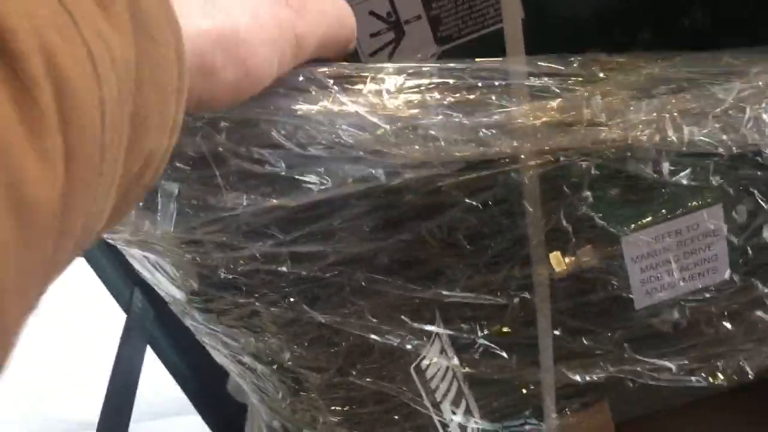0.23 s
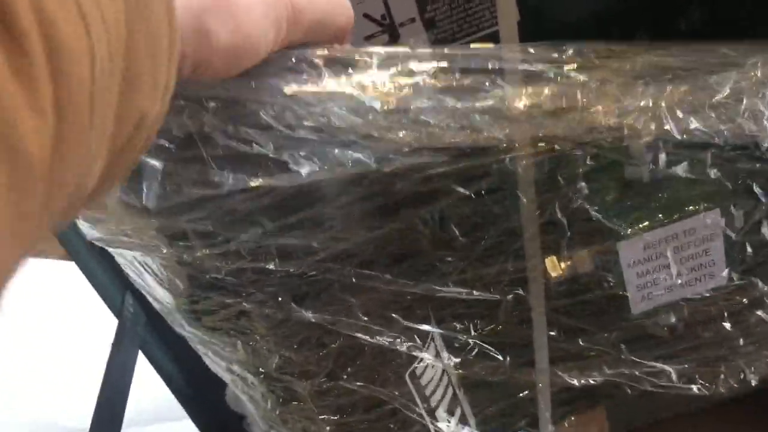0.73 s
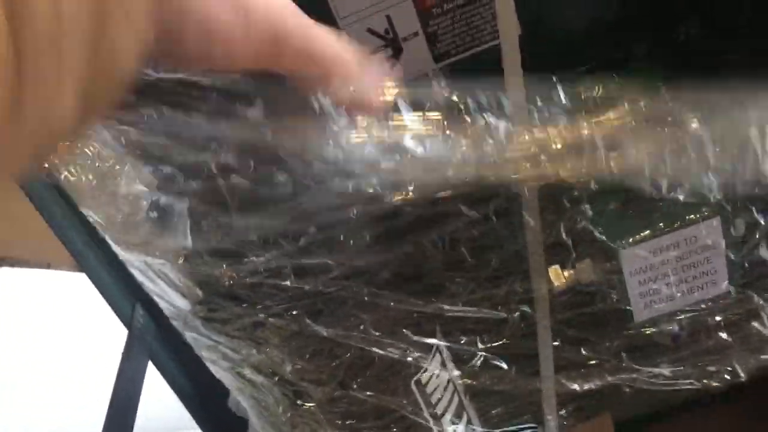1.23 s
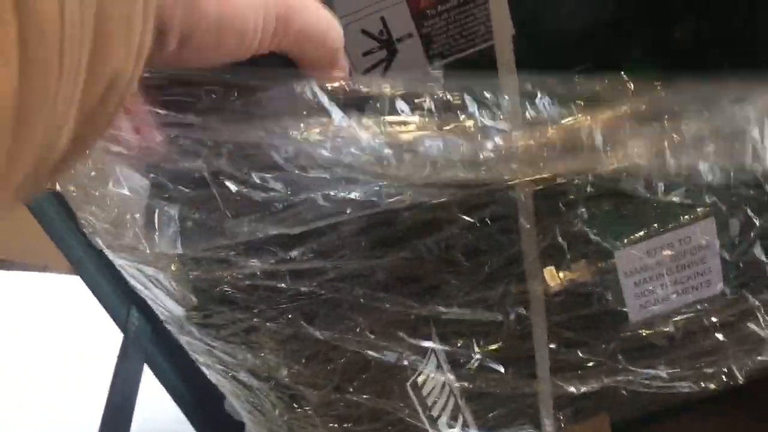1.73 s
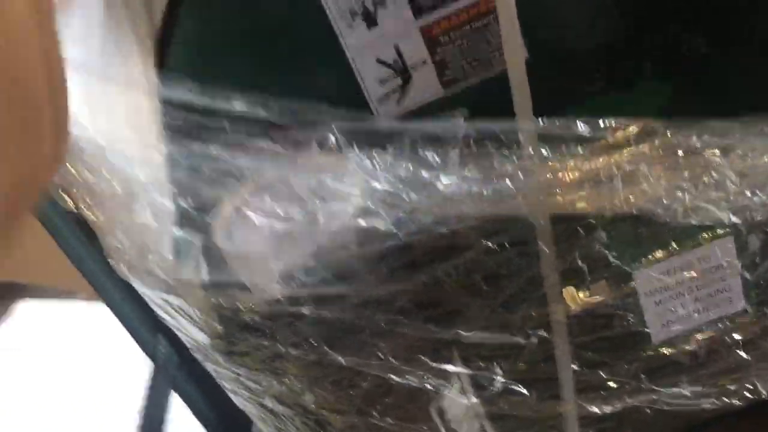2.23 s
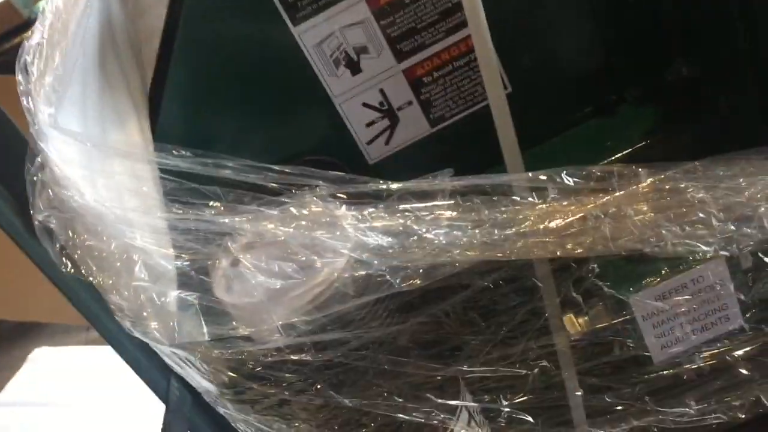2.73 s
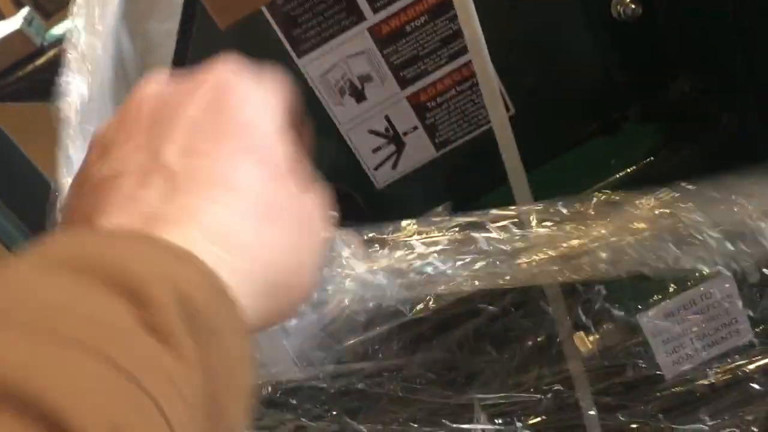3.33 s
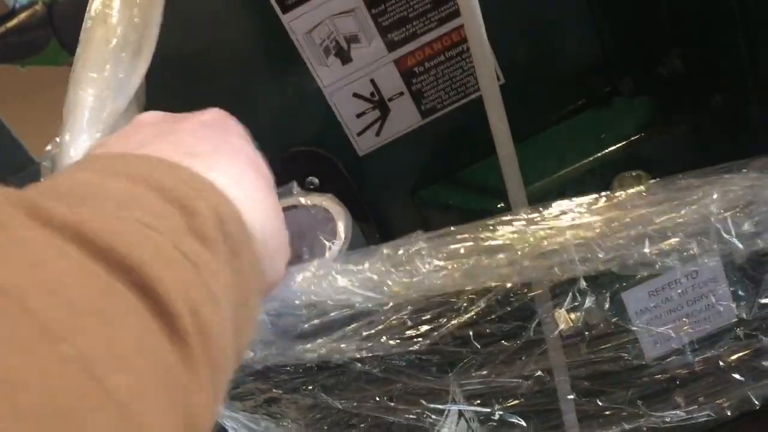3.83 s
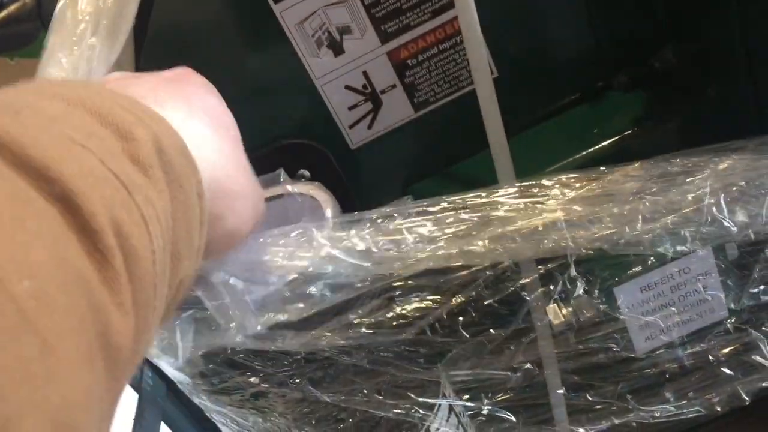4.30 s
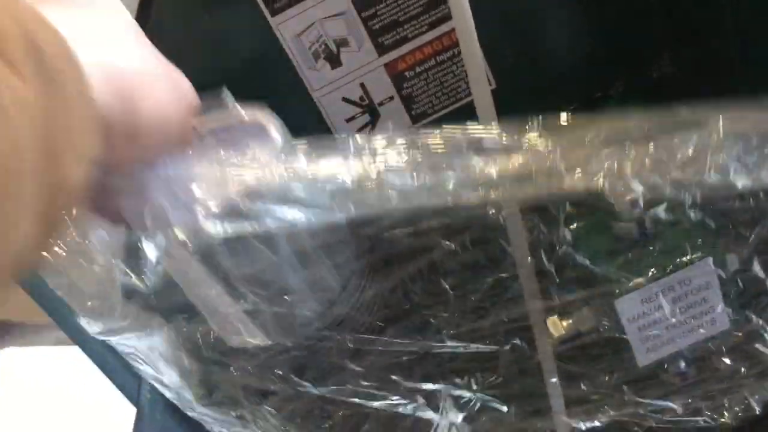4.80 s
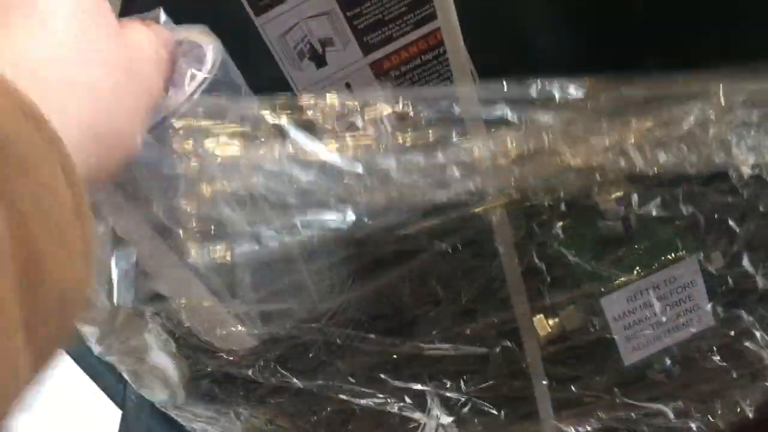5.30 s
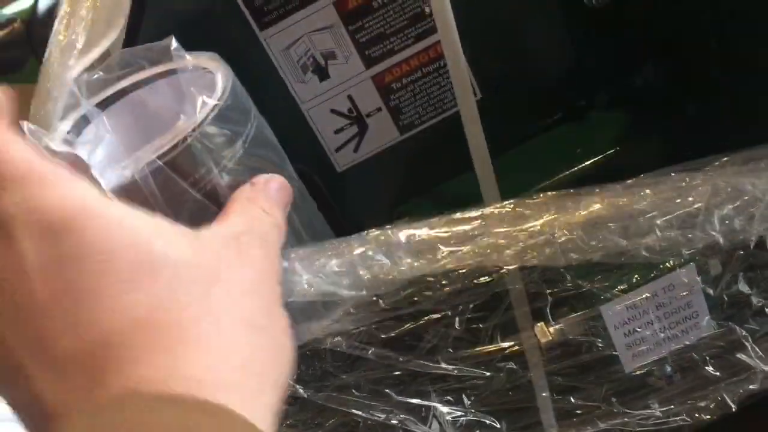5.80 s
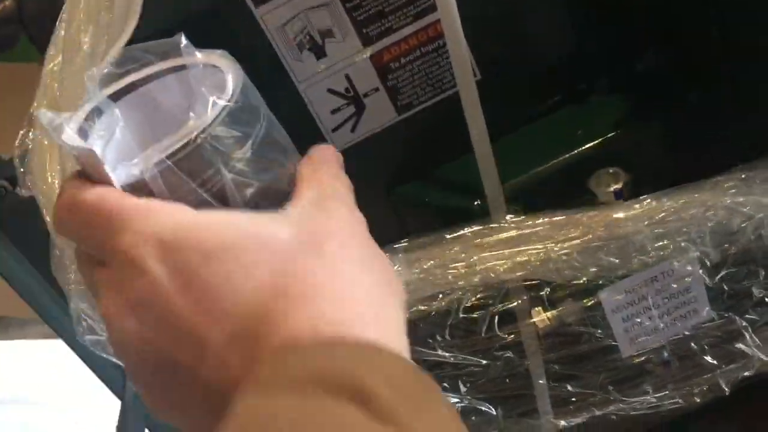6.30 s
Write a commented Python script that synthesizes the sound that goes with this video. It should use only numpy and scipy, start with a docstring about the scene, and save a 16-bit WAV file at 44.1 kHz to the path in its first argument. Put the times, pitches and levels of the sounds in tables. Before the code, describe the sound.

Close, dry crinkling of clear packing film in a quiet room, tugged in bursts, with sharp snaps and dull hollow metal thuds.

```python
"""A quiet room, close to the microphone: a hand pulls thin plastic wrap off painted metal parts and
works a bagged hollow cylinder free. Creases buckle as dense, clumped clicks in many narrow bands;
louder snaps are short ringing bursts of shocks. The cylinder knocks and drags on the sheet-metal
frame, both sounding decaying modes of the parts; it groans once as a sinking tone.
Beneath lie a short diffuse tail, a hush of wandering noise bands and a faint whine."""
import sys
import numpy as np
from scipy import signal
from scipy.io import wavfile

SR = 44100
rng = np.random.default_rng(int(sys.argv[2]) if len(sys.argv) > 2 else 0)


def wav_out(sig):
    """Save sig, one row per channel (or a flat mono array), as 16-bit PCM at SR to the path in sys.argv[1]."""
    wavfile.write(sys.argv[1], SR, np.round(np.clip(np.atleast_2d(sig).T, -1, 1) * 32767).astype(np.int16))


N = 288855


def from_db(db):
    """Decibels to amplitude gain."""
    return 10 ** (np.asarray(db) / 20)


def rms_one(x):
    """Scale to unit rms."""
    return x / np.sqrt(np.mean(x ** 2) + 1e-20)


def at_hz(points, hz):
    """Read a spectrum on a log-frequency axis."""
    points_hz, points_db = np.array(points).T
    return np.interp(np.log(hz), np.log(points_hz), points_db)


def drift(rate_hz):
    """Slow random wander of rms 1: noise through a double one-pole low-pass, at an eighth of the rate."""
    r = np.exp(-16 * np.pi * rate_hz / SR)
    noise = rng.standard_normal(N // 8 + 2002)
    slow = signal.lfilter([1], [1, -2 * r, r * r], noise)[2000:]  # drop the filter's start
    return np.interp(np.arange(N) / 8, np.arange(len(slow)), rms_one(slow))


def band(x, low_hz, high_hz):
    """Band-pass."""
    return signal.sosfilt(signal.butter(2, [low_hz, high_hz], "band", fs=SR, output="sos"), x)


def ring(force, hz, t60_s):
    """A resonator: a unit click sets a decaying sine of height 1 ringing."""
    r = from_db(-60 / (t60_s * SR))
    w = 2 * np.pi * hz / SR
    return signal.lfilter([0, np.sin(w)], [1, -2 * r * np.cos(w), r * r], force + 1e-18)


def clicks(per_s, spread_db):
    """Random clicks of either sign, a few much larger than the rest."""
    sizes = from_db(spread_db * np.minimum(rng.exponential(1, N), 5))
    signs = rng.choice([-1, 1], N)
    return sizes * signs * (rng.random(N) < per_s / SR)


# Tugs at the film; the levels are relative and all follow the crackle's course: start_s, length_s,
# crackle_start_db, crackle_end_db, large_crease_db, frame_drag_start_db, cylinder_drag_start_db
TUGS = [(0.001, 0.15, -40.5, -34.5, 1.5, -45.5, -54), (0.221, 0.066, -35.5, -40, 11.5, -34, -54),
        (0.372, 0.12, -39.5, -35, 1.5, -51, -62), (0.56, 0.017, -33.5, -33.5, 6.5, -34, -49),
        (0.665, .18, -40, -41, 6.5, -48.5, -55), (0.874, 0.18, -32.5, -31.5, 0, -49, -47.5),
        (1.152, 0.052, -28, -37.5, 4.5, -31, -29.5), (1.228, .14, -43, -34, 3.5, -47, -60),
        (1.402, 0.077, -45, -52.5, 12, -30.5, -37.5), (1.483, 0.064, -43.5, -24, 9, -46.5, -61),
        (1.582, .14, -40, -40.5, 1, -37, -50), (1.802, 0.15, -44, -38, 12, -42, -43.5),
        (2.011, 0.081, -41.5, -36, 12, -42, -40.5), (2.127, 0.042, -46.5, -48.5, 9.5, -37, -43),
        (2.226, 0.17, -54, -61.5, 21, -46.5, -57), (2.473, 0.085, -49.5, -52, 7, -53, -69),
        (2.598, 0.23, -56.5, -64, 9, -56, -67), (2.848, 0.14, -65.5, -69.5, 3, -45, -67),
        (3.069, 0.014, -52, -61, 18, -36, -66), (3.15, 0.087, -66.5, -74, 11, -37.5, -75),
        (3.304, 0.18, -59.5, -65, 20, -55, -64), (3.442, 0.057, -37, -27.5, -5, -56, -46.5),
        (3.528, 0.053, -37.5, -39.5, -4, -63, -43), (3.651, .43, -41, -32, -0.5, -62.5, -50.5),
        (4.095, 0.19, -40, -47.5, -6, -57, -54), (4.395, 0.2, -38.5, -39, 0, -64, -52),
        (4.638, 0.064, -34, -36, -0.5, -49.5, -46.5), (4.75, 0.26, -32.5, -28.5, 0.5, -54.5, -48),
        (5.003, 0.17, -27.5, -37.5, -1, -49, -43.5), (5.248, 0.059, -35, -27, -2.5, -56, -50),
        (5.31, .12, -30.5, -30.5, 1.5, -47, -42), (5.484, 0.16, -39, -43, 11, -45, -43),
        (5.652, 0.2, -33.5, -42, 6.5, -45, -41), (5.844, 0.16, -40, -38, 7.5, -60, -49.5),
        (6.073, 0.053, -42, -41, 7, -54, -46), (6.231, 0.3, -36, -37, 5.5, -51.5, -54.5)]
TIGHTEN_DB_PER_S, SLACKEN_DB_PER_S = 418, 367   # how fast a tug sets in and lets go
SETTLE_DB_PER_S = 243   # the metal parts come to rest more slowly


def tugs():
    """Levels of crackle, large creases and drag: each tug sets in, holds its course and lets go."""
    t = np.arange(0, N + 64, 64) / SR
    start, length, film_db, end_db, large_db, frame_db, cylinder_db = np.transpose(TUGS)[:, :, None]
    course_db = (end_db - film_db) * np.clip((t - start) / length, 0, 1)
    course_db = course_db - TIGHTEN_DB_PER_S * np.maximum(start - t, 0)
    after_s = np.maximum(t - start - length, 0)
    film_db = film_db - SLACKEN_DB_PER_S * after_s
    frame_db = frame_db - SETTLE_DB_PER_S * after_s
    cylinder_db = cylinder_db - SLACKEN_DB_PER_S * after_s
    # overlapping tugs add in power
    powers = [from_db(2 * np.maximum(db + course_db, -120)) for db in (film_db, frame_db, cylinder_db)]
    large = np.sum(powers[0] * large_db, axis=0) / np.sum(powers[0], axis=0)
    film, frame, cylinder = [10 * np.log10(np.sum(p, axis=0)) for p in powers]
    return [np.interp(np.arange(N) / SR, t, curve) for curve in (film, large, frame, cylinder)]


# Colour of the crackling film: pitch_hz, relative level_db (per Hz)
FILM = [(180, -41), (300, -9), (574, 2), (1030, 4.5), (1840, 6.5), (2100, 5), (2610, 7), (4520, 5.5),
        (4910, 4), (5800, 8), (7690, -0.5), (9390, 2), (10400, -3), (15000, -2.5), (16000, -16)]
CLICKS_PER_S = 6000   # for a busy film, before clumping
CLICK_SPREAD_DB, LARGE_TOP_DB = 4.5, 17


def crackle(level_db, large_db):
    """Creases buckle in clumps, sparsely when the film is left alone; large ones sound low."""
    clump_db = 2.4 * drift(40) + 1.4 * drift(200)
    busy = np.clip(from_db(0.7 * (level_db + 50)), .03, 1)
    train = clicks(CLICKS_PER_S * busy * from_db(clump_db), CLICK_SPREAD_DB)
    train = train * from_db(0.42 * clump_db) / np.sqrt(busy)
    band_place = rng.uniform(-2, 24, N)      # the band nearest each click's crease size
    slide = rng.standard_normal((2, N))      # film sliding on film
    large_db = np.minimum(large_db, LARGE_TOP_DB)
    out = 0
    for k, hz in enumerate(np.geomspace(400, 14500, 22)):
        reach = np.exp(-((band_place - k) / 2.0) ** 2)
        grain = rms_one(band(train * reach, hz / 1.09, hz * 1.09))
        hiss = rms_one(band(slide[k % 2], hz / 1.09, hz * 1.09))
        low_share = np.clip(np.log(6000 / hz) / 2.35, 0, 1)
        band_db = at_hz(FILM, hz) + low_share * large_db + 1.12 * drift(10.8)
        gain = from_db(band_db) * np.sqrt(hz / 6000)  # wider bands carry more
        out = out + gain * (grain + 0.65 * busy * hiss * from_db(0.87 * clump_db))
    return from_db(level_db - 10.0) * out


# Creases that snap: start_s, peak level_db, pitch_hz
SNAPS = [(0.123, -25, 3680), (0.2234, -14.5, 1650), (0.5475, -26, 1870), (0.658, -21.5, 3150),
         (0.881, -21, 2010), (1.045, -30, 5350), (1.078, -19, 3020), (1.0998, -17, 1680),
         (1.1426, -21, 1700), (1.4127, -19.5, 1200), (1.432, -27, 1300), (1.479, -23.5, 2330),
         (1.5457, -4.5, 1360), (1.7993, -22, 2560), (1.8801, -16, 1190), (2.0517, -11, 1850),
         (2.0911, -11.5, 2590), (2.2278, -33, 4120), (2.2957, -40, 6490), (2.3311, -38, 2510),
         (2.393, -40, 5330), (2.4523, -47, 2770), (2.4842, -26, 6340), (2.528, -30, 6600),
         (2.623, -33, 2750), (2.689, -37, 5760), (2.7556, -51, 2810), (2.803, -43, 2950),
         (2.8709, -41.5, 3370), (2.9013, -45, 5010), (2.9138, -45, 6710), (2.9294, -50, 6450),
         (2.9597, -54, 3480), (2.9816, -57, 2740), (3.057, -22, 2680), (3.1118, -44, 5860),
         (3.2088, -42.5, 3200), (3.2809, -39.5, 9700), (3.3258, -44, 7400), (3.3438, -45, 2800),
         (3.3957, -49, 2580), (3.4268, -31, 1850), (3.457, -23, 3160), (3.5021, -11.5, 3130),
         (3.529, -12, 3230), (3.5554, -7.5, 3800), (3.6, -15.5, 2720), (3.6718, -18.5, 3260),
         (3.7474, -11, 6200), (3.772, -16.5, 3830), (3.8568, -12.5, 3220), (3.908, -5, 6200),
         (3.9295, -12.5, 2170), (3.9407, -7.5, 3230), (3.9837, -16, 5360), (4.0208, -9, 3200),
         (4.0736, -15, 2600), (4.1802, -23, 1640), (4.2253, -29, 1740), (4.377, -26, 2640),
         (4.532, -18, 4720), (4.6224, -18.5, 3420), (4.709, -16.5, 3140), (4.751, -12.5, 3500),
         (4.9313, -23, 5730), (4.994, -6.5, 3180), (5.0533, -10, 5720), (5.1122, -15, 4540),
         (5.2504, -20, 2280), (5.2934, -17, 6840), (5.4362, -12.5, 2560), (5.6433, -20, 4390),
         (5.7524, -17.5, 2650), (5.7728, -21, 4340), (5.9547, -21.5, 1960), (6.1001, -21, 1620),
         (6.1903, -24.5, 1340), (6.2268, -30, 2620), (6.245, -18, 2300), (6.3382, -16, 2560)]
CRACK_DB = -4   # bright edge against the ringing part, for a pitch of 3000 Hz


def snaps():
    """A burst of shocks as the crease gives way; large, low creases take longer."""
    length = 800
    out, t = np.zeros(N + length), np.arange(length) / SR
    bursts = rng.standard_normal((len(SNAPS), length))
    for (start_s, level_db, hz), noise in zip(SNAPS, bursts):
        shocks = noise ** 3 * (1 - np.exp(-t / 0.00057)) * np.exp(-t * hz / 4.36)
        tone = band(ring(shocks, hz, 4.7 / hz), hz / 2.82, min(hz * 1.85, 18000))
        crack = band(shocks, 3500, 15000)
        crack_gain = from_db(CRACK_DB) * np.sqrt(hz / 3000)  # stronger for small creases
        snap = tone / np.abs(tone).max() + crack_gain * crack / np.abs(crack).max()
        at = round(start_s * SR)
        out[at:at + length] += from_db(level_db) * snap / np.abs(snap).max()
    return out[:N]


# Blows of the cylinder: start_s, cavity_db, frame_db, bracket_db, panel_db, rim_db,
# freedom to ring (1 = the modes' own ring time)
KNOCKS = [(0.078, -28, -41, -36, -35, -25, 1), (0.163, -22.5, -31, -32, -40, -23, 0.62),
          (0.233, -20.5, -18.5, -24, -46, -23, 0.58), (0.298, -23.5, -33, -30, -41, -34, 1),
          (0.566, -28, -28, -29, -29, -25.5, 1), (0.586, -23, -44, -27.5, -25, -42, 1),
          (1.08, -25.5, -29, -28, -56, -31, 1), (1.151, -24, -23, -24.5, -47, -24, 0.6),
          (1.193, -18.5, -37, -20, -46, -23, 0.56), (1.388, -22, -22, -22.5, -27, -23, 0.45),
          (1.438, -30, -29, -37, -23, -30, 0.6), (1.536, -18, -24.5, -24, -22, -20, 0.95),
          (1.547, -17, -27, -8.5, -30, -8, 0.66), (1.567, -8, -19, -11, -34, -14.5, 0.56),
          (1.799, -19.5, -27, -32, -50, -21, 0.68), (1.884, -10.5, -42, -29, -53, -40, 1),
          (2.031, -20, -49, -36, -45, -40, 0.7), (2.054, -5.5, -22, -12.5, -40, -11, 0.58),
          (2.093, -15.5, -17.5, -26, -44, -23, .53), (2.819, -5.5, -15, -29, -43, -34, 1),
          (3.055, -12, -8, -7.5, -46, -19, 0.35), (3.146, -19, -23, -10.5, -54, -39, 0.47),
          (3.531, -25, -48, -47, -60, -31, 0.6), (3.669, -20, -36, -44, -51, -37, 0.68),
          (3.72, -23.5, -45, -52, -63, -31, 0.95), (3.75, -17.5, -35.5, -54, -64, -28, 1),
          (3.774, -23, -50, -45, -65, -36, 0.7), (3.973, -18, -39, -45, -62, -35, .55),
          (4.073, -23.5, -31, -45, -52, -38, 0.6), (5.308, -48, -39, -37, -22, -31, 0.5),
          (5.378, -30, -32, -32, -33, -35, 0.45), (5.421, -0.5, -17, -39, -50, -28, 0.09),
          (6.121, -38, -44, -55, -41, -37, 0.91), (6.189, -26, -52, -46, -62, -33, 0.44)]
# Modes of the cylinder's cavity, the frame, its bracket, the sheet panel and the rim:
# pitch_hz, relative level_db, ring t60_s when free
CAVITY = [(585.7, 0.5, 0.062), (668.5, -5.5, 0.046), (861, -12, 0.06)]
FRAME = [(234.5, 0, 0.12), (272.5, 1.5, 0.046), (178.8, -16, 0.44)]
BRACKET = [(303, 2.5, 0.063), (358.8, -8.5, 0.25), (451, -4, 0.068)]
PANEL = [(103.6, -3.5, 0.22), (132, 3.5, 0.08), (78, -7.5, 0.14)]
RIM = [(1804, -7.5, 0.098), (2145, 3.5, 0.018), (2940, -6, 0.028)]
SWELL_CYCLES = .45


def knocks():
    """Each blow sounds every part; a mode swells within a cycle and has its own strength each time."""
    parts = (CAVITY, FRAME, BRACKET, PANEL, RIM)
    t = np.arange(SR // 4) / SR
    out, luck = np.zeros(N + len(t)), rng.standard_normal((len(KNOCKS), 5, 8))
    for (start_s, *levels, freedom), draws in zip(KNOCKS, luck):
        at = round(start_s * SR)
        freedom = np.clip(freedom, .1, 1.5)
        for modes, level_db, draw in zip(parts, levels, draws):
            for (hz, mode_db, t60_s), chance in zip(modes, draw):
                swell = (1 - np.exp(-t * hz / SWELL_CYCLES)) ** 2
                decay = from_db(-60 * t / (t60_s * freedom))
                gain = from_db(level_db + mode_db + 1.9 * chance)
                out[at:at + len(t)] += gain * swell * decay * np.sin(2 * np.pi * hz * t)
    return out[:N]


def body(force, modes, freedom):
    """The summed modes of one part, their ring shortened by the hand's grip."""
    out = 0
    for hz, level_db, t60_s in modes:
        mode = ring(force, hz, t60_s * freedom)
        out = out + from_db(level_db) * band(mode, hz / 1.41, hz * 1.39)
    return out


PANEL_UNDER_FRAME_DB = 3   # the drag reaches the panel through the frame


def drag(frame_db, cylinder_db):
    """Stick-slip jolts feed the panel, frame and cavity modes while the hand damps them."""
    parts = ((PANEL, frame_db - PANEL_UNDER_FRAME_DB), (FRAME + BRACKET, frame_db), (CAVITY, cylinder_db))
    out = 0
    for modes, level_db in parts:
        jolts = clicks(400 * from_db(3.2 * drift(23)), 2.0)
        out = out + from_db(level_db) * rms_one(body(jolts, modes, freedom=0.31))
    return out


# the cylinder groans as it slides free
GROAN_S, GROAN_LENGTH_S, GROAN_FADE_S, GROAN_DB = 5.545, 0.144, 0.033, -41
GROAN_HZ, GROAN_SAG_HZ_PER_S, GROAN_OCTAVE_DB = 123, 173, -5


def groan():
    """A slightly unsteady low tone and its octave that sink in pitch."""
    t = np.arange(N) / SR - GROAN_S
    hz = GROAN_HZ - GROAN_SAG_HZ_PER_S * np.clip(t, 0, GROAN_LENGTH_S)
    phase = 2 * np.pi * np.cumsum(hz * (1 + 0.0407 * drift(29.6))) / SR
    gate = np.clip(np.minimum(t, GROAN_LENGTH_S - t) / GROAN_FADE_S, 0, 1)
    level = np.sqrt(2) * gate * from_db(GROAN_DB + 3.3 * drift(15))
    octave = from_db(GROAN_OCTAVE_DB + 4.4 * drift(40)) * np.sin(2 * phase)
    return level * (np.sin(phase) + octave)


def walls(x, t60_s, wet_db):
    """A short diffuse tail: decaying, dulled noise as the room's response."""
    t = np.arange(round(.4 * SR)) / SR
    tail = rng.standard_normal(len(t)) * from_db(-60 * t / t60_s) * (t > .004)
    tail = signal.lfilter([.5], [1, -.5], tail)
    tail = tail / np.sqrt(np.sum(tail ** 2))
    return from_db(wet_db) * signal.fftconvolve(x, tail)[:N]


# Colour of the room's hush: pitch_hz, relative level_db (per Hz)
ROOM = [(30, 21), (100, 3), (250, -1.5), (500, -5), (1050, 16), (1500, -23), (2900, -24), (4000, -16),
        (8000, -18), (16000, -40)]
ROOM_DB = -57   # rms of the hush
WHINE_HZ, WHINE_DB = 2880, -81   # a faint thin tone in the background


def room_tone():
    """Hush in slowly wandering half-octave noise bands and a faint whine of narrowly resonated noise."""
    edges = 30 * 2 ** np.arange(0, 9.6, .5)
    white = rng.standard_normal((2, N))
    hush = 0
    for k, (low, high) in enumerate(zip(edges, edges[1:])):
        level_db = at_hz(ROOM, np.sqrt(low * high)) + 3.0 * drift(1.6)
        hush = hush + from_db(level_db) * band(white[k % 2], low, high)
    whine = rms_one(ring(white[0], WHINE_HZ, .05))
    return from_db(ROOM_DB) * rms_one(hush) + from_db(WHINE_DB) * whine


def scene():
    """Film, blows, drag and groan near the microphone, their reflections and the hush."""
    crackle_db, large_db, frame_db, cylinder_db = tugs()
    film = crackle(crackle_db, large_db) + snaps()
    metal = knocks() + drag(frame_db, cylinder_db) + groan()
    near = film + metal
    return (near + walls(near, t60_s=0.21, wet_db=-17.5) + room_tone())[None]


STOP_HZ = 16218   # from here up the top is at least 70 dB down


def record(dry):
    """The microphone drops the deep bass, peaks are rounded, the top is cut steeply."""
    x = signal.sosfilt(signal.butter(2, 60, "high", fs=SR, output="sos"), dry)
    x = .85 * np.tanh(x / .85)
    return signal.sosfilt(signal.cheby2(16, 70, STOP_HZ, fs=SR, output="sos"), x)


dry = scene()
out = record(dry)
wav_out(out)
```